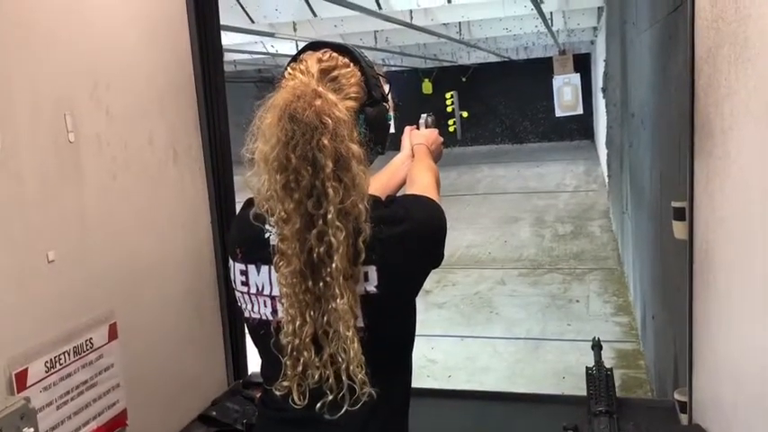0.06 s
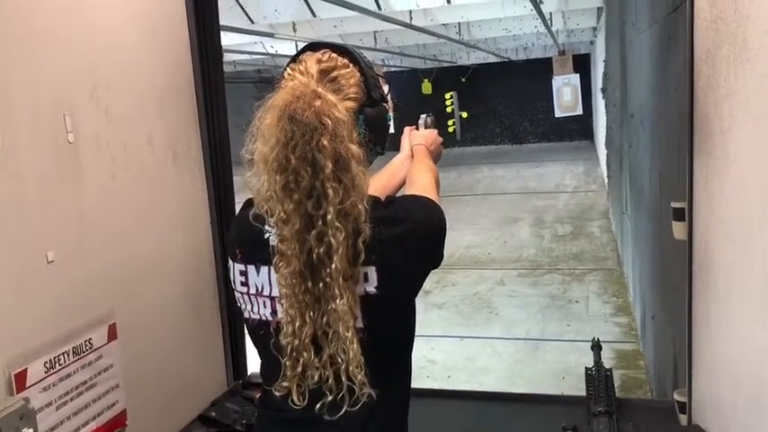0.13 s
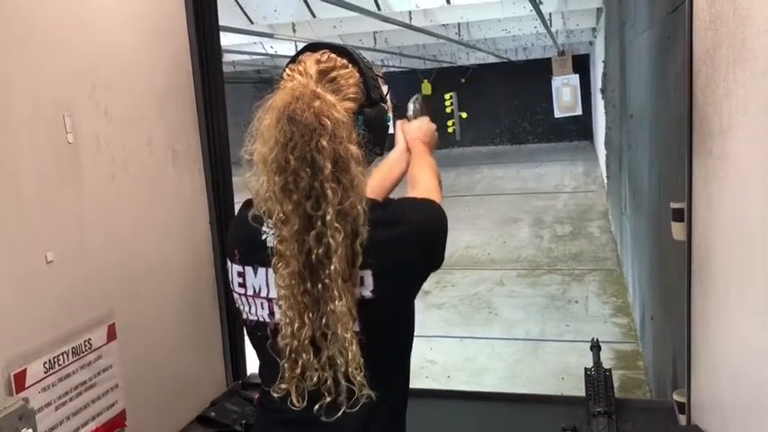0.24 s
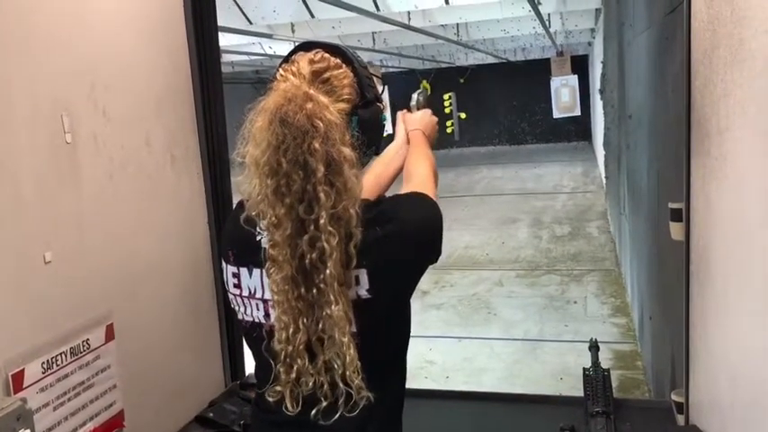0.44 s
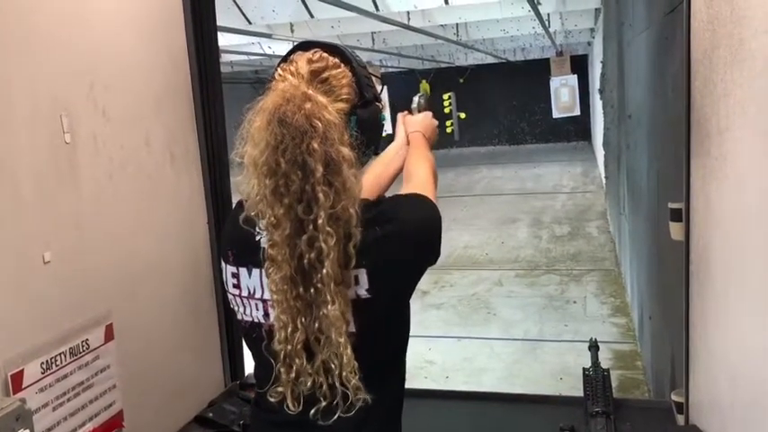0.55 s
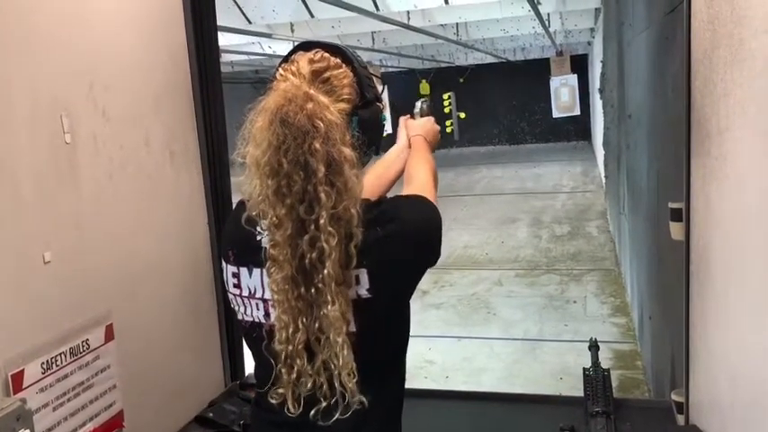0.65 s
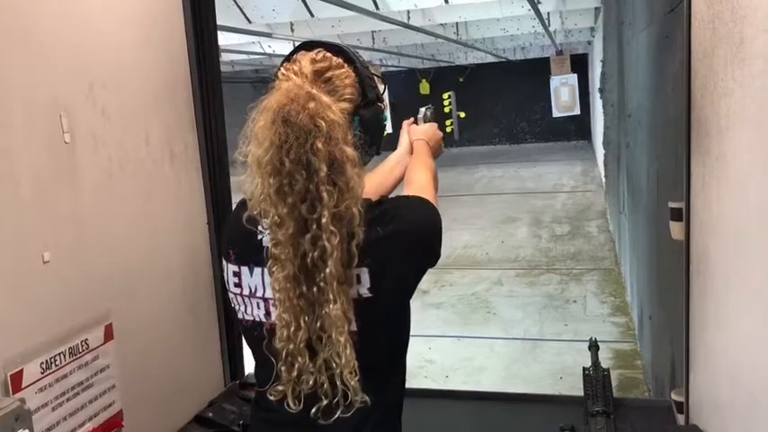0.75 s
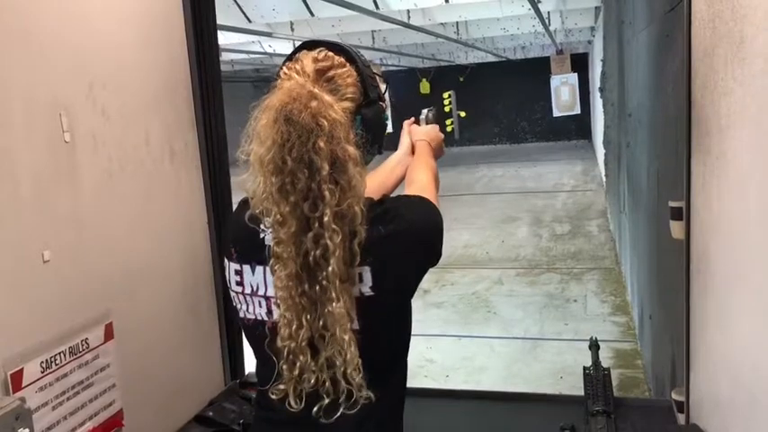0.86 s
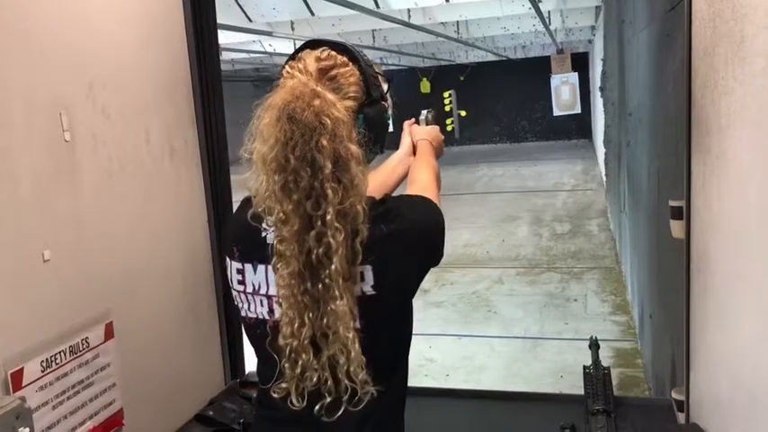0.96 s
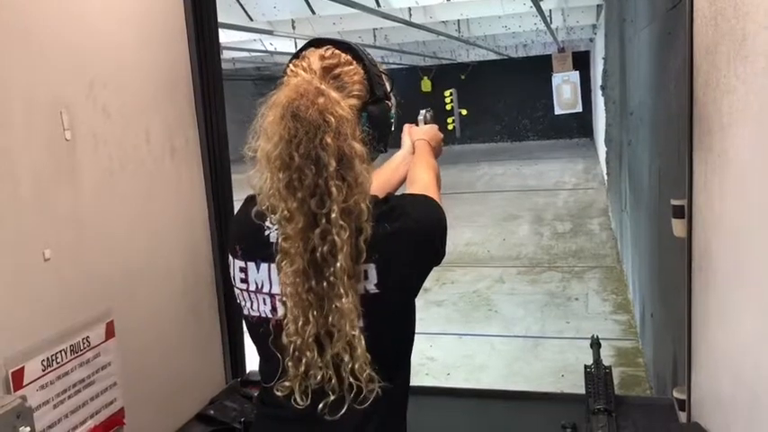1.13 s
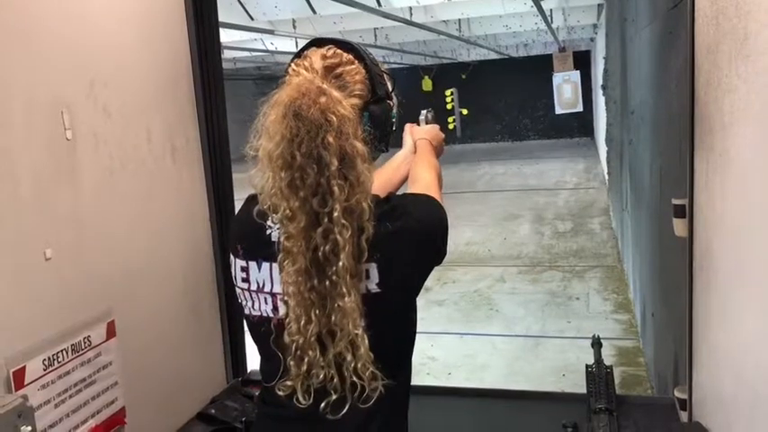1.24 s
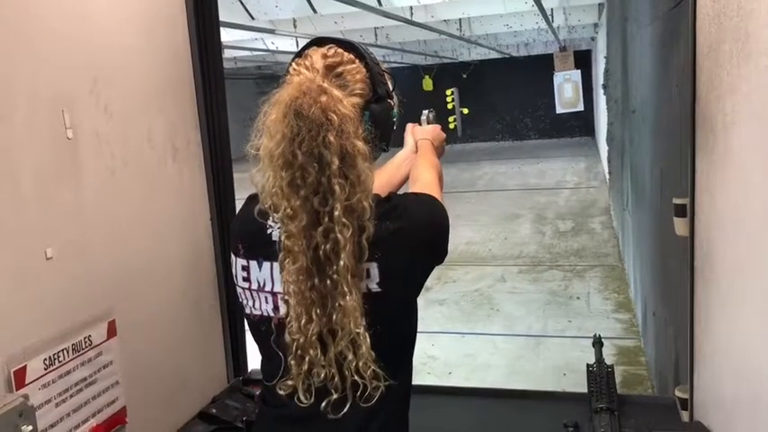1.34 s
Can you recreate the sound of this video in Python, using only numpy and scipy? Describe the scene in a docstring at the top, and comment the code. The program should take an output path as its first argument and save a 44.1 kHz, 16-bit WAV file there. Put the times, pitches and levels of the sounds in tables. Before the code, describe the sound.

Over faint ventilation rumble, a pistol fires once near the microphone in an indoor shooting range. The sharp blast overloads briefly and reverberates down the lane, with a tiny metallic tick as it dies away.

```python
"""One handgun shot from a booth of an indoor range. Ventilation rumbles and the action clicks.
The blast builds as a rush, jolts the booth into resonance, cracks and fills the lane with reverberation;
the recorder clips and turns its gain far down. Near walls reflect slaps and thuds, the far end returns
a boom and a dull swell, and the spent case ticks. As the gain recovers, the ventilation slowly returns."""
import sys
import numpy as np
from scipy.fft import rfft, irfft, next_fast_len
from scipy.io import wavfile
from scipy.ndimage import minimum_filter1d, map_coordinates

SR = 44100
rng = np.random.default_rng(int(sys.argv[2]) if len(sys.argv) > 2 else 0)


def transcribe(signal):
    """Save signal, clipped to [-1, 1], as a 16-bit WAV file at the path in sys.argv[1]."""
    frames = np.atleast_2d(signal).T
    limited = np.clip(frames, -1, 1)
    pcm = np.round(limited * 32767).astype(np.int16)
    wavfile.write(sys.argv[1], SR, pcm)


N = 61739
T = np.arange(N) / SR
RUSH_S, PUSH_S, CRACK_S = 0.2168, 0.2318, 0.2398  # stages of the blast


def amp(db):
    """Amplitude ratio of a level in decibels."""
    return 10 ** (np.asarray(db) / 20)


def along(points, hz):
    """Interpolation of (frequency, value) points on a logarithmic frequency axis."""
    frequencies, values = np.transpose(points)
    return np.interp(np.log(hz + 1), np.log(frequencies + 1), values)


def filtered(x, response):
    """Linear filtering: the spectrum is multiplied by a frequency response."""
    size = next_fast_len(N + SR // 2)
    return irfft(rfft(x, size) * response(np.fft.rfftfreq(size, 1 / SR)), size)[..., :N]


def noise(spectrum):
    """Spectral shaping of white noise, normalised to rms 1."""
    x = filtered(rng.standard_normal(N), lambda hz: amp(along(spectrum, hz)))
    return x / np.sqrt(np.mean(x ** 2) + 1e-20)


def decay(start_s, t60_s):
    """Exponential damping: gain 1 until start_s, then 60 dB down every t60_s."""
    return np.exp(-np.log(1000) * np.maximum(T - start_s, 0) / t60_s)


def burst(spectrum, start_s, t60_s):
    """A transient: noise with a sudden onset and exponential decay."""
    return noise(spectrum) * (T >= start_s) * decay(start_s, t60_s)


def reverberation(spectrum, decays, start_s):
    """A diffuse field: after start_s each band dies away at its own rate."""
    centres_hz, t60s = np.transpose(decays)
    band_shapes = [np.c_[centres_hz, weights] for weights in np.eye(len(t60s))]
    bands = filtered(noise(spectrum), lambda hz: np.array([along(shape, hz) for shape in band_shapes]))
    return sum(band * decay(start_s, t60_s) for band, t60_s in zip(bands, t60s))


def ring(modes, centre_s, half_rise_s):
    """Modal superposition: sinusoids build up around centre_s, then decay freely."""
    rise = np.clip((T - centre_s + half_rise_s) / (2 * half_rise_s), 0, 1)
    return rise * sum(
        amp(db) * decay(centre_s + half_rise_s, t60_s) * np.sin(2 * np.pi * (hz * T + rng.random()))
        for hz, db, t60_s in modes)


# duct noise: frequency_hz, relative_db
DUCT_SPECTRUM = [(20, -30.5), (40, -13.5), (75, -1), (150, -5.5), (210, -2.5), (300, -5.5), (420, -11.5),
                 (520, -14), (750, -17), (1600, -17.5), (3000, -28.5), (5500, -34), (9000, -46),
                 (15000, -59.5)]
# fan tones: pitch_hz, level_db
FAN_TONES = [(204.6, -35.5), (490, -43), (555, -46), (616, -46)]
def ventilation(waver_rad=1.0, sway_db=3, drift_hz=9):
    """Broadband flow noise in the ducts, with fan tones randomly modulated in level and phase."""
    def drift():
        return map_coordinates(rng.standard_normal(64), [T * drift_hz], mode="mirror")
    tones = sum(amp(db + sway_db * drift()) * np.sin(2 * np.pi * hz * T + waver_rad * drift())
                for hz, db in FAN_TONES)
    return amp(-28) * noise(DUCT_SPECTRUM) + tones


# the action, then the spent case: start_s, level_db, t60_s
METAL_IMPACTS = [(.185, -30, 0.065), (.63, -22.5, .09)]
# one click: frequency_hz, relative_db
CLICK_SPECTRUM = [(500, -27), (2500, -1), (4500, -1.5), (6500, -7), (7600, 3.5), (10000, -3.5),
                  (15000, -7.5)]
def metal_clicks(room_db=-17, room_t60_s=0.14):
    """Brief metal impacts radiate bright transients, each with a faint reverberant tail."""
    return sum(
        amp(db) * (burst(CLICK_SPECTRUM, s, t60_s) + amp(room_db) * burst(CLICK_SPECTRUM, s, room_t60_s))
        for s, db, t60_s in METAL_IMPACTS)


# dull swell: frequency_hz, relative_db
SWELL_SPECTRUM = [(25, -27), (50, -16.5), (80, -11.5), (150, -6.5), (210, 0), (380, 0.5), (720, -4),
                  (1270, 0), (2600, -12.5), (4500, -17), (8000, -22.5), (15000, -46.5)]
# its reverberation times: frequency_hz, t60_s
SWELL_DECAYS = [(70, 0.556), (250, 0.4246), (1000, 0.5), (3000, 0.4396), (7000, 0.28), (12000, 0.29)]
# returning bass: frequency_hz, relative_db
BOOM_SPECTRUM = [(20, -45), (32, -30), (48, -15), (62, -2), (85, -6), (130, -3.5), (175, -19), (400, -23),
                 (1500, -79)]
# lingering modes of the lane: pitch_hz, level_db, t60_s
LANE_MODES = [(571, -12.5, 0.73), (770, -14.5, 0.8), (1007, -15, 0.87)]
def far_end(swell_s=0.44, rise_db_per_s=73, boom_s=0.3877, boom_rise_s=0.044, decay_delay_s=0.058):
    """Late reflections return as a swell and a boom; lightly damped lane modes outlast them."""
    swell_db = 3 + rise_db_per_s * np.minimum(T - swell_s, 0)
    swell = amp(swell_db) * reverberation(SWELL_SPECTRUM, SWELL_DECAYS, swell_s) * (T >= CRACK_S)
    boom_rise = np.clip((T - boom_s) / boom_rise_s, 0, 1)
    boom = amp(-6) * noise(BOOM_SPECTRUM) * boom_rise * decay(boom_s + decay_delay_s, t60_s=0.59)
    return swell + boom + ring(LANE_MODES, boom_s, decay_delay_s)


# slaps off walls and ceiling baffles: start_s, level_db
SLAP_ARRIVALS = [(0.261, 6), (0.3029, 3), (0.3265, 4.5)]
# one slap: frequency_hz, relative_db
SLAP_SPECTRUM = [(200, -12), (500, -3), (1400, 0), (3000, -4), (8000, -9.5), (15000, -23)]
# low thuds off the near walls: start_s, level_db
THUD_ARRIVALS = [(0.275, 15.5), (0.308, 7)]
# one thud: frequency_hz, relative_db
THUD_SPECTRUM = [(60, -34), (150, -9.5), (215, 2.5), (320, -7.5), (500, -14.5), (1500, -41.5),
                 (5000, -79.5)]
def near_walls():
    """Early reflections from nearby surfaces arrive as separate slaps and thuds."""
    slaps = sum(amp(db) * burst(SLAP_SPECTRUM, s, t60_s=0.03) for s, db in SLAP_ARRIVALS)
    thuds = sum(amp(db) * burst(THUD_SPECTRUM, s, t60_s=0.068) for s, db in THUD_ARRIVALS)
    return slaps + thuds


# modes rung by the pressure push: pitch_hz, level_db, t60_s
PUSH_MODES = [(205.7, 17.5, 0.11), (295, 15, .035), (396.1, 22, 0.034), (510, 16, 0.023),
              (2908.7, 19.5, 0.045), (3088, 16, 0.034)]
# standing waves of the booth: pitch_hz, relative_db, t60_s
BOOTH_MODES = [(203, -3, .5), (228, -3, 0.26), (252, -3.5, 0.13), (381, 4, 0.54), (592.7, 4, .45),
               (788, 0.5, .45), (870.6, 1.5, 0.72), (1057, 3, 0.69), (1215, 0.5, .35), (1396, 5, .35),
               (1459, 4.5, 0.12), (1676, 4, .33), (1937, -1.5, 0.14)]
def booth(half_rise_s=0.002):
    """Impulse excitation: the pressure push and the crack set the booth's modes ringing."""
    return ring(PUSH_MODES, PUSH_S, half_rise_s) + amp(1.5) * ring(BOOTH_MODES, CRACK_S, half_rise_s)


# first rush: frequency_hz, relative_db
RUSH_SPECTRUM = [(40, -12), (200, -0.5), (1200, 0), (2500, -5), (5000, -14.5), (10000, -21.5),
                 (15000, -21.5)]
# crack at the blast front: frequency_hz, relative_db
CRACK_SPECTRUM = [(100, -20.5), (600, -5.5), (1900, 1), (3000, -3), (4500, -5), (7500, -6.5), (10000, -13),
                  (15000, -17)]
# blast in the lane: frequency_hz, relative_db
BLAST_SPECTRUM = [(30, -25), (110, -15.5), (220, -11), (450, -3.5), (720, -4.5), (1050, 0.5), (1400, 2),
                  (2000, -3), (2500, -7), (4400, -7), (6000, -11.5), (9000, -15.5), (15000, -23)]
# its reverberation times: frequency_hz, t60_s
BLAST_DECAYS = [(80, .6), (250, 0.74), (1200, .42), (2500, .31), (6000, .32), (12000, .28)]
def blast(growth_db_per_s=347.5):
    """A blast wave: a rush grows exponentially into the crack, which excites the lane's diffuse field."""
    rush_db = 6.5 + growth_db_per_s * (np.minimum(T, CRACK_S) - RUSH_S)
    rush = amp(rush_db) * noise(RUSH_SPECTRUM) * (T >= RUSH_S) * decay(CRACK_S, t60_s=0.08)
    crack = amp(22) * burst(CRACK_SPECTRUM, CRACK_S, t60_s=0.033)
    lane = amp(21) * reverberation(BLAST_SPECTRUM, BLAST_DECAYS, CRACK_S) * (T >= CRACK_S)
    return rush + crack + lane


def scene():
    """Superposition of all sources at one microphone."""
    return (ventilation() + metal_clicks() + far_end() + near_walls() + booth() + blast())[None]


def record(dry):
    """Automatic gain control: loud peaks cut the gain, which holds, then creeps back; overloads clip."""
    trigger, target_db, max_cut_db = 0.5, -18, 27
    hold_s, release_db_per_s = 0.59, 14
    top_hz, edge_hz = 15950, 300  # low-pass band limit
    peak = -minimum_filter1d(-np.abs(dry[0]), size=45)  # running maximum over 1 ms
    cut_db = np.clip(20 * np.log10(peak + 1e-9) - target_db, 0, max_cut_db) * (peak > trigger)
    half_hold = int(hold_s * SR) // 2
    held_db = -minimum_filter1d(-cut_db, 2 * half_hold + 1, origin=half_hold, mode="constant")
    release_db = release_db_per_s * T
    eased_db = np.maximum.accumulate(held_db + release_db) - release_db
    clipped = np.clip(dry * amp(-eased_db), -1, 1)
    return filtered(clipped, lambda hz: np.clip((top_hz - hz) / edge_hz, 0, 1) ** 2)


dry = scene()
out = record(dry)
transcribe(out)
```